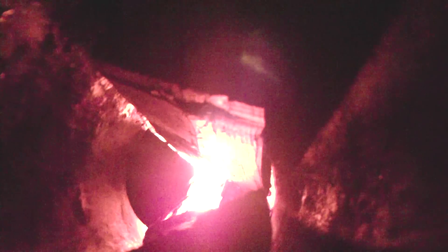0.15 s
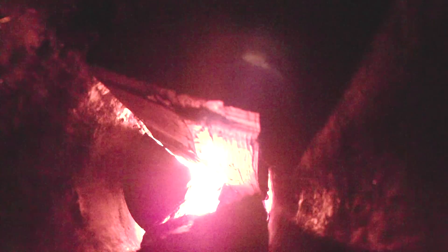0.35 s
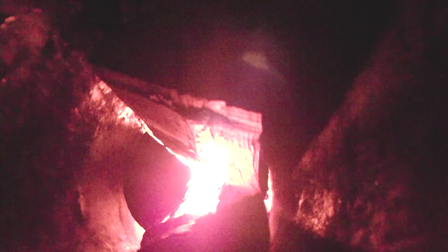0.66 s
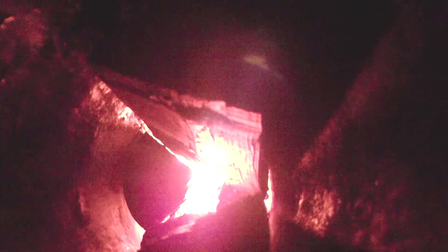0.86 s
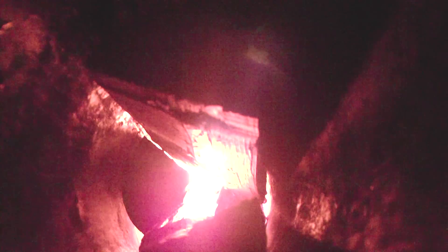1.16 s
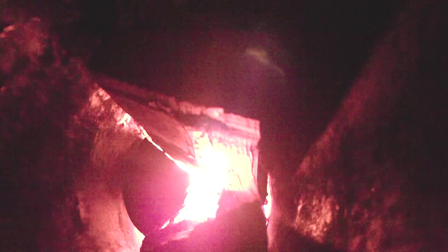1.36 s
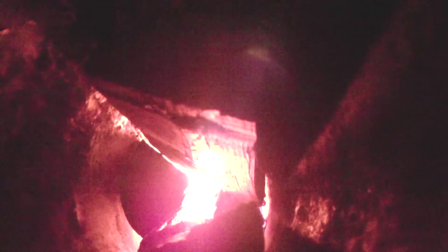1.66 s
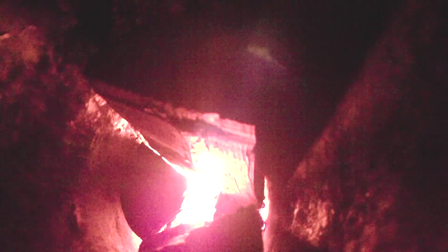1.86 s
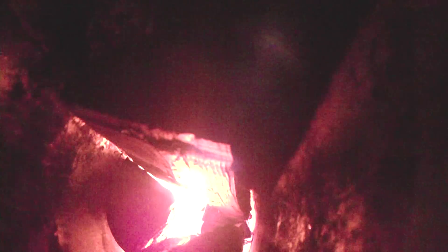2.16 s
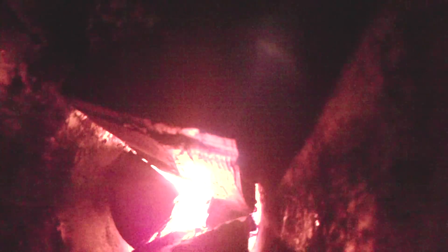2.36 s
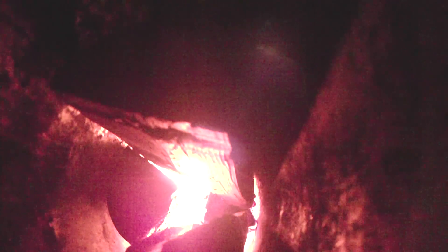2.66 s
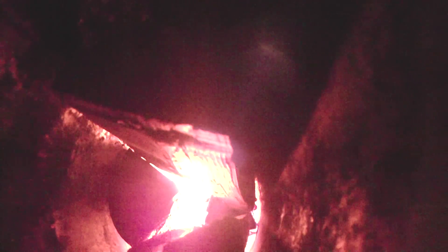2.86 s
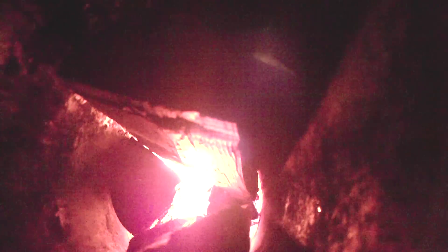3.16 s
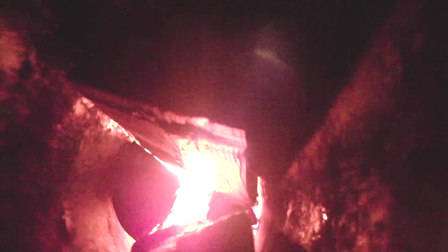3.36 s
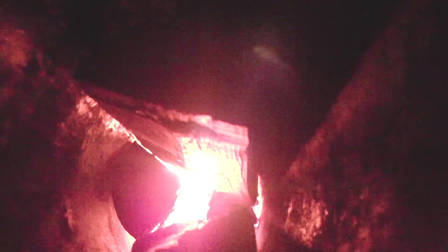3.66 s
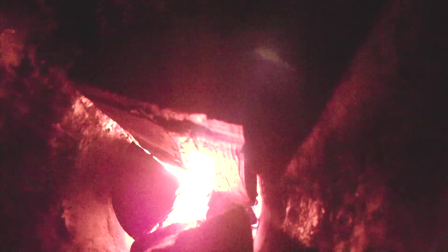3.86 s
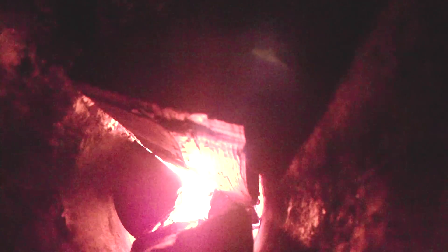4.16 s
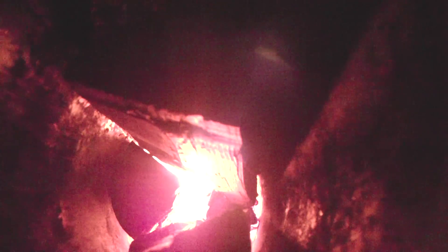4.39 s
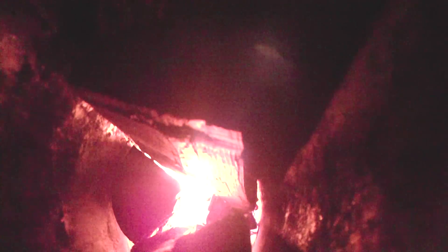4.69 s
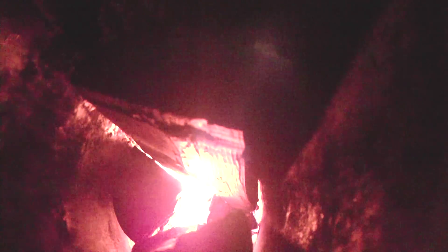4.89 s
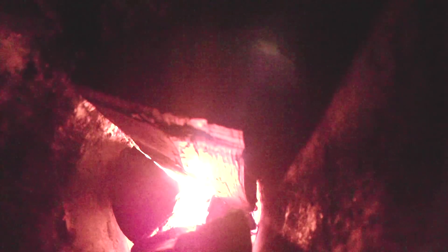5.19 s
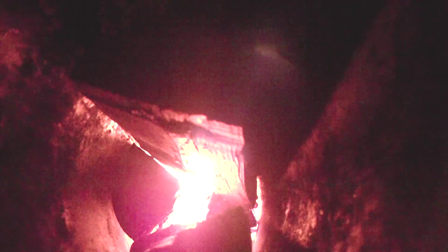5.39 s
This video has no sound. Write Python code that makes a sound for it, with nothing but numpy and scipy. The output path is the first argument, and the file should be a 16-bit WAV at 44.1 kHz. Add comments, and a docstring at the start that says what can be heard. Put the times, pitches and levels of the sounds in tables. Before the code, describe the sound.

A wood-burning boiler hums and rumbles low while its flames flutter hollowly, embers tick sharply and a draught fan hisses, mostly on the left.

```python
"""Basement, close to a burning wood boiler, dry: no room reflections are added.
Behind, two motor shafts hum a beating low note and the draught fan hums and hisses; embers tick, gas pops.
In front, noise blown through hollow firebox resonances and a broad roar swell with the flares.
A two-second stretch is cut in two passages and looped on the left; the first sweeps in from the right,
and at the end it also plays on the right alone. A preamplifier, a notch and a steep top cut follow."""
import sys
import numpy as np
from scipy import signal
from scipy.fft import rfft, irfft
from scipy.io import wavfile
from scipy.ndimage import uniform_filter1d

SR = 44100
rng = np.random.default_rng(int(sys.argv[2]) if len(sys.argv) > 2 else 0)


def output_pcm(signal):
    """Save a mono or channel-first signal as 16-bit PCM at the path in sys.argv[1].

    Samples are clipped to [-1, 1] before scaling.
    """
    pcm = np.clip(np.atleast_2d(signal).T, -1, 1) * 32767
    wavfile.write(sys.argv[1], SR, np.round(pcm).astype(np.int16))


N = 243996

# Source levels are nominal, ahead of the preamplifier and the entry levels; source times are those of the
# stretch. Resonances are run twice in the sources, except the single ring of the faint ticks; their width is
# that of a single pass.

# motor shafts, nearly equal in speed so that their hum beats: (turns per second f/Hz, rms level/dB)
SHAFT_TONES = [(53.66, -34), (59.12, -38)]
# slow change of the shaft hum: (t/s, change of level/dB)
SHAFT_LEVEL = [(1.15, -0.5), (1.35, -0.5), (1.54, -1.3), (1.72, 1), (1.9, -3.5), (2.09, -4), (2.28, 2.3),
               (2.44, -2), (2.63, 0), (2.82, -1.5), (2.99, 0), (3.17, -2)]
SHAFT_IN_STEP_S, SHAFT_WAVER_DB = 2.082, 2.5

# air hiss of the draught, shape only: (f/Hz, relative density level/dB)
HISS_SPECTRUM = [(1100, -1.5), (1880, -3), (1960, -4.5), (2300, -6.5), (3000, -9), (3300, -8), (4000, -8),
                 (4700, -12.5), (5300, -10.5), (5900, -5.5), (6700, -6), (8600, -4.5), (9600, -7),
                 (12000, -6), (14600, -4), (15600, -8)]
HISS_DB = -45  # rms
# fan casing and duct resonances: (f/Hz, width/Hz, rms level/dB)
CASING_MODES = [(1850, 150, -60.5), (2168, 70, -72.5), (3245, 220, -68), (4850, 450, -66.5)]
# fan motor tones: (f/Hz, rms level/dB)
MOTOR_TONES = [(161, -50.5), (537, -57), (814, -64.5), (965, -61), (1086, -62.5), (1206, -68.5),
               (1825, -64.5)]

# ember ticks: (t/s, peak level/dB, centre f/Hz, width/Hz, time to fall 60 dB/s)
EMBER_TICKS = [(1.091, -39, 9800, 3000, 0.0066), (1.4328, -23, 10800, 9500, 0.004),
               (1.7405, -37, 11500, 4000, .006), (1.743, -30, 8600, 5500, 0.007),
               (1.7448, -25.5, 7900, 5000, 0.007), (1.7445, -36, 1700, 2200, 0.02),
               (1.7475, -33, 6300, 1600, 0.04), (1.7545, -24.5, 7700, 5200, 0.012),
               (1.755, -40, 2000, 2200, 0.018), (1.7565, -32, 5900, 1500, 0.022),
               (1.7585, -31, 7600, 4200, 0.018), (2.5866, -24.5, 8100, 2400, 0.012),
               (2.587, -27, 12500, 5500, 0.0065), (2.755, -31.5, 12000, 6000, 0.013),
               (2.7917, -22, 12300, 6000, 0.006), (2.8914, -29, 11500, 7500, 0.0061),
               (3.1035, -30, 13000, 4000, .008), (3.141, -35, 12000, 5000, .008)]
FAINT_TICKS_PER_S, FAINT_IMPULSE_DB = 170, -57  # least impulse, before it rings
# flame pops: (t/s, peak level/dB, centre f/Hz)
FLAME_POPS = [(1.744, -33, 520), (2.066, -32.5, 724), (2.684, -27.5, 596), (2.942, -30, 640),
              (3.17, -28, 560)]
POP_WIDTH_SHARE, POP_T60_S = 0.6, 0.03  # width as a share of the centre; fall of the puff by 60 dB

# lower and upper boom of the combustion chamber: (f/Hz, width/Hz)
BOOM_MODES = [(219, 19), (256, 15.7)]
# lower boom: (t/s, level/dB)
LOWER_BOOM_LEVEL = [(1.08, -45.5), (1.35, -34.5), (1.37, -51), (1.4, -35), (1.44, -43), (1.49, -35),
                    (1.56, -46), (1.6, -32), (1.63, -46), (1.69, -31.5), (1.8, -41.5), (1.82, -36.5),
                    (1.96, -36.5), (2.0, -51), (2.03, -35.5), (2.12, -33.5), (2.27, -47.5), (2.32, -62),
                    (2.35, -31), (2.4, -42.5), (2.42, -54), (2.45, -36), (2.48, -43), (2.54, -31),
                    (2.6, -33.5), (2.63, -69), (2.64, -46), (2.66, -30.5), (2.8, -44), (2.83, -68),
                    (2.88, -34.5), (2.91, -48), (2.95, -38), (2.97, -32), (2.99, -83), (3.02, -33),
                    (3.05, -43.5), (3.06, -57), (3.09, -32.5), (3.2, -40)]
# upper boom: (t/s, level/dB)
UPPER_BOOM_LEVEL = [(1.08, -37), (1.1, -36), (1.21, -44), (1.23, -41), (1.35, -44), (1.37, -65),
                    (1.41, -48.5), (1.52, -39), (1.54, -59), (1.62, -41.5), (1.65, -69), (1.68, -48),
                    (1.73, -65), (1.86, -33.5), (1.93, -42), (1.95, -71), (1.99, -37), (2.12, -45.5),
                    (2.29, -52), (2.3, -52), (2.37, -38), (2.4, -42), (2.44, -46.5), (2.86, -40.5),
                    (2.89, -48.5), (3.03, -44), (3.06, -65), (3.08, -36), (3.18, -41), (3.2, -45)]
# hollow note and two upper firebox resonances: (f/Hz, width/Hz)
FIREBOX_MODES = [(443, 40), (610, 45), (815, 53)]
# hollow note, two upper resonances, roar: (level between flares/dB, waver/dB, share of the flare's rise)
CALM_FLAME = [(-45, 0.1, 0.96), (-58, 1.5, 0.83), (-62, 2, 0.58), (-48, 0.7, 0.34)]
# flares, rises before the share is taken: (middle t/s, hollow note rise/dB, upper modes and roar rise/dB, length/s)
FLAME_FLARES = [(1.098, 5, 9, 0.24), (1.192, 11.5, 10.5, 0.032), (1.348, 9, 4.5, 0.057),
                (1.448, 7, 7, 0.09), (1.641, 8.5, 5, 0.069), (1.743, 8, 6, 0.017), (1.86, 11, 15.5, 0.095),
                (2.03, 12, 11.5, 0.062), (2.121, -2, 18, 0.033), (2.223, 10.5, 12.5, 0.046),
                (2.253, 9.5, 14.5, 0.06), (2.307, 10, 8, 0.07), (2.495, 11.5, 12.5, 0.054),
                (2.549, 10.5, 14, 0.038), (2.73, 10.5, 14.5, 0.1), (2.819, 9.5, 20, 0.025),
                (2.936, 12, 18.5, 0.15), (3.086, 9, 9.5, 0.074), (3.18, 13, 12, 0.031)]
# broad roar of the flame, shape only: (f/Hz, relative density level/dB)
ROAR_SPECTRUM = [(12, 26), (22, 16), (40, 20), (65, 6.5), (90, 16.5), (118, 9.5), (140, 8), (165, 14),
                 (200, 14), (300, 6.5), (360, 6), (500, 5), (620, 2.5), (730, -1.5), (820, 0), (1000, -5),
                 (1700, -13.5), (1950, -9)]
# low part of the roar, steady through the flares: (t/s, rms level/dB)
RUMBLE_LEVEL = [(1.06, -38.5), (1.4, -34.5), (1.7, -33.5), (1.96, -36), (2.01, -38.5), (2.05, -38),
                (2.4, -35), (2.75, -37), (3.04, -36.5), (3.1, -39), (3.15, -39)]
ROAR_SPLIT_HZ, ROAR_FLUTTER_DB = 600, 2

# passages in looped order: (start t/s, taken from stretch t/s, end t/s)
LOOP = [(-.01, 2.1255, 1.058), (1.058, 1.058, 3.193), (3.193, 1.7916, 4.5949), (4.5949, 1.058, 5.6)]
SPLICE_S = .0006
# entry of the first passage: (t after entry/s, own level/dB, left level/dB, right level/dB, fan level/dB)
ENTRY = [(0, -2.5, -25, -6, -1), (.011, -4, -15, -5, -3), (.018, -3.5, -11, -4.5, -0.5),
         (.026, 0, -4, -13, -2), (0.03, -1.5, 7, -30, -4), (.036, -2.3, -.8, -41, 1.2),
         (.05, 0.34, 0.1, -69, -0.13)]
RIGHT_ENTRY_S, RIGHT_DULLING = 5.3287, 0.18  # dulling: share of the treble that is lost

PREAMP_DB = 7.5
NOTCH_HZ, NOTCH_WIDTH_HZ, CUTOFF_HZ = 7784, 1010, 15740


def amp(db):
    """dB to gain."""
    return 10 ** (np.asarray(db) / 20)


def rms_one(x):
    """Scale to rms 1."""
    return x / np.sqrt(np.mean(x ** 2) + 1e-20)


def butter(x, order, hz, kind="low"):
    """Butterworth filter."""
    return signal.sosfilt(signal.butter(order, hz, kind, fs=SR, output="sos"), x)


def in_time(rows, delay=0):
    """Columns of a table joined by straight lines in time."""
    s, *columns = np.transpose(rows)
    return [np.interp(np.arange(N) / SR - delay, s, column) for column in columns]


def drift(rate_hz):
    """Slow chance with spread 1: white noise through two equal low-pass poles."""
    step = 40  # samples between the drawn points
    r = np.exp(-2 * np.pi * rate_hz * step / SR)
    steps = rng.standard_normal(N // step + 2002)
    slow = signal.lfilter([1], [1, -2 * r, r * r], steps)[2000:]  # settled part
    return np.interp(np.arange(N) / step, np.arange(len(slow)), rms_one(slow))


def resonate(x, hz, width_hz):
    """Two-pole resonance, gain 1 on top."""
    r = np.exp(-np.pi * width_hz / SR)
    zeros = [(1 - r * r) / 2, 0, (r * r - 1) / 2]
    poles = [1, -2 * r * np.cos(2 * np.pi * hz / SR), r * r]
    return signal.lfilter(zeros, poles, x + 1e-18)


def resonate_twice(x, hz, width_hz):
    """The same resonance two times over, for steeper skirts."""
    return resonate(resonate(x, hz, width_hz), hz, width_hz)


def coloured(spectrum, patchy_db, together):
    """Noise of a given spectrum in octave bands, each flickering partly alone, partly in step."""
    hz = np.maximum(np.arange(N // 2 + 1) * SR / N, 1)
    table_hz, table_db = np.transpose(spectrum)
    shape_db = np.interp(np.log(hz), np.log(table_hz), table_db, left=-90, right=-90)
    noise = rfft(rng.standard_normal(N)) * amp(shape_db)
    octave = np.log2(hz / 15)
    out = 0
    for k in range(11):
        overlap = np.clip(1 - np.abs(octave - k), 0, 1)
        band = irfft(noise * overlap, N)
        out = out + band * amp(patchy_db * (together + 0.58 * drift(8.1)))
    return out


def shafts():
    """Fan and pump each hum once per turn; the two notes swell where they fall in step."""
    t = np.arange(N) / SR - SHAFT_IN_STEP_S
    out = np.zeros(N)
    for hz, rms_db in SHAFT_TONES:
        level_db = rms_db + in_time(SHAFT_LEVEL)[0] + SHAFT_WAVER_DB * drift(3.1)
        out += np.sqrt(2) * amp(level_db) * np.sin(2 * np.pi * hz * t)
    return out


def fan():
    """Flickering air hiss, a casing rung by noise, and motor tones that waver in level and phase."""
    t = np.arange(N) / SR
    out = amp(HISS_DB) * rms_one(coloured(HISS_SPECTRUM, patchy_db=1.0, together=0.26 * drift(37)))
    for hz, width_hz, rms_db in CASING_MODES:
        level = amp(rms_db + 1.6 * drift(2.1))
        out += level * rms_one(resonate_twice(rng.standard_normal(N), hz, width_hz))
    for hz, rms_db in MOTOR_TONES:
        level = np.sqrt(2) * amp(rms_db + 2.2 * drift(5.5))
        out += level * np.sin(2 * np.pi * hz * t + 0.76 * drift(1.6))
    return out


def faint_ticks():
    """Random impulses of random size, each ringing one of four treble resonances."""
    born = rng.random(N) < FAINT_TICKS_PER_S / SR
    size_db = FAINT_IMPULSE_DB + 6.2 * np.minimum(rng.exponential(1, N), 2.1)
    impulses = born * amp(size_db) * rng.choice([-1, 1], N)
    dealt = rng.integers(0, 4, N)
    out = np.zeros(N)
    for k, hz in enumerate([6500, 8500, 11000, 13500]):
        out += 3.7 * resonate(impulses * (dealt == k), hz, 0.45 * hz)
    return out


def embers():
    """Each tick is a snap and a dying spit of noise in its own band; many fainter ones come at random."""
    out, t = np.zeros(N), np.arange(1500) / SR
    spits = rng.standard_normal((len(EMBER_TICKS), len(t)))
    for (s, peak_db, hz, width_hz, t60), spit in zip(EMBER_TICKS, spits):
        spit = spit * np.abs(spit) ** 0.75 + 1.3 * (t == 0)  # grainy, with a snap in front
        dying = spit * amp(-60 * t / max(t60, .002))
        edges = np.clip([hz - width_hz / 2, hz + width_hz / 2], 300, .45 * SR)
        tick = butter(dying, 4, edges, "band")
        at = round(s * SR)
        out[at:at + len(t)] += amp(peak_db) * tick / np.abs(tick).max()
    return out + faint_ticks()


def pops():
    """Gas pockets catch light: a dying puff of noise in a wide resonance gives a short dull pop."""
    out, t = np.zeros(N), np.arange(3000) / SR
    puffs = rng.standard_normal((len(FLAME_POPS), len(t)))
    for (s, peak_db, hz), puff in zip(FLAME_POPS, puffs):
        pop = resonate_twice(puff * amp(-60 * t / POP_T60_S), hz, POP_WIDTH_SHARE * hz)
        at = round(s * SR)
        out[at:at + len(t)] += amp(peak_db) * pop / np.abs(pop).max()
    return out


def flares():
    """Rise in dB of hollow note, two upper resonances and roar: every flare swells and sinks in a bell."""
    s, hollow_db, bright_db, length = np.transpose(FLAME_FLARES)[:, :, None]
    bell = np.exp(-(2 * (np.arange(N) / SR - s) / length) ** 2)
    hollow_db = np.max(hollow_db * bell, axis=0)  # the strongest flare rules
    bright_db = np.max(bright_db * bell, axis=0)
    return hollow_db, bright_db, bright_db, bright_db


def blown(hz, width_hz):
    """Noise in a resonance, its slow level evened out: the flame, not chance, sets it."""
    tone = resonate_twice(rng.standard_normal(N), hz, width_hz)
    return tone / np.sqrt(uniform_filter1d(tone ** 2, size=1100))  # 25 ms


def fire():
    """Turbulent burning drives the firebox resonances and a broad roar that follows the same flares."""
    flame_db = []
    for (calm_db, waver_db, share), rise_db in zip(CALM_FLAME, flares()):
        flame_db.append(calm_db + share * rise_db + waver_db * drift(13.0))
    *firebox_db, roar_db = flame_db
    boom_db = in_time(LOWER_BOOM_LEVEL) + in_time(UPPER_BOOM_LEVEL)  # joins two lists
    out = np.zeros(N)
    for mode, level_db in zip(BOOM_MODES + FIREBOX_MODES, boom_db + firebox_db):
        out += amp(level_db) * blown(*mode)
    # flares lift the upper roar; the rumble keeps its own level
    roar = coloured(ROAR_SPECTRUM, patchy_db=0.67, together=2.7 * drift(5.0))
    upper = rms_one(butter(roar, 2, ROAR_SPLIT_HZ, "high"))
    calm = coloured(ROAR_SPECTRUM, patchy_db=-2.2, together=0.54 * drift(5.3))
    rumble = rms_one(butter(calm, 2, ROAR_SPLIT_HZ))
    out += amp(in_time(RUMBLE_LEVEL)[0]) * rumble
    return out + amp(roar_db + ROAR_FLUTTER_DB * drift(30)) * upper


def scene():
    """The stretch is laid out in its looped order; the first passage pans from right to left as it enters."""
    opening = LOOP[1][1]
    own_db, *_, fan_db = in_time(ENTRY, delay=opening)
    stretch = shafts() + fire() + fan() * amp(fan_db) + embers() + pops()
    stretch = stretch * amp(own_db)
    out, t = np.zeros((2, N)), np.arange(N) / SR
    for start, source, end in LOOP:
        splice = np.clip(np.minimum(t - start, end - t) / SPLICE_S + .5, 0, 1)
        piece = np.roll(stretch, round((start - source) * SR)) * splice
        if source == opening:
            left_db, right_db = in_time(ENTRY, delay=start)[1:3]
            out[1] += piece * amp(right_db) * (t < start + ENTRY[-1][0])
            piece = piece * amp(left_db)
        out[0] += piece
    # the right-hand copy is a little duller
    duller = stretch - RIGHT_DULLING * butter(stretch, 1, 3000, "high")
    out[1] += np.roll(duller, round((RIGHT_ENTRY_S - opening) * SR)) * (t >= RIGHT_ENTRY_S)
    return out


def record(dry):
    """Preamplifier gain, a narrow treble notch made by subtracting a resonance twice, a steep top cut."""
    x = amp(PREAMP_DB) * dry
    for _ in range(2):
        x = x - resonate(x, NOTCH_HZ, NOTCH_WIDTH_HZ / 2)
    x = signal.sosfilt(signal.cheby2(14, 45, CUTOFF_HZ, fs=SR, output="sos"), x)
    return signal.sosfilt(signal.cheby2(12, 60, 16600, fs=SR, output="sos"), x)


dry = scene()
out = record(dry)
output_pcm(out)
```